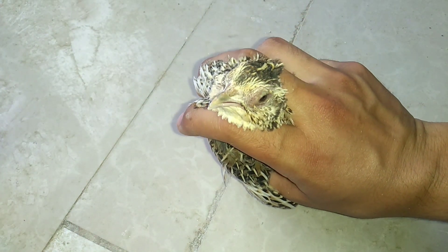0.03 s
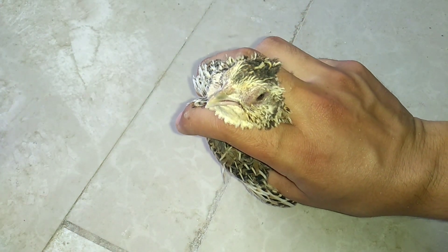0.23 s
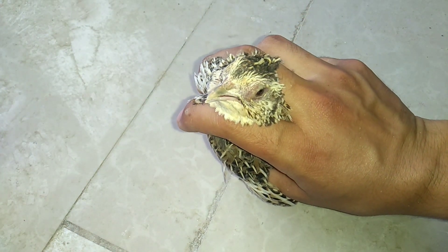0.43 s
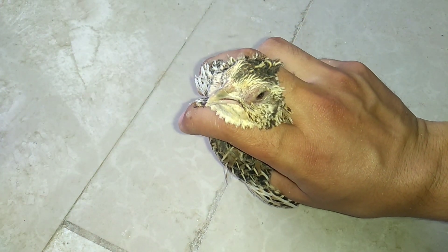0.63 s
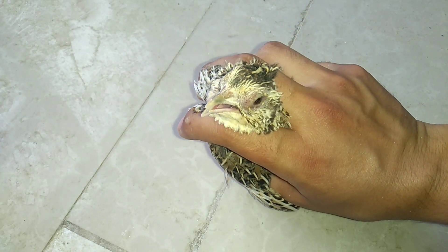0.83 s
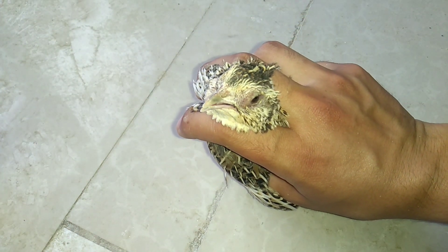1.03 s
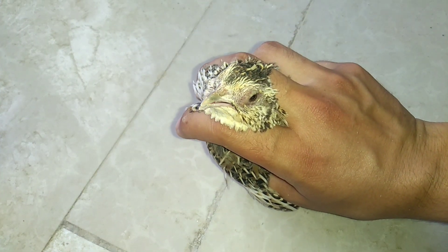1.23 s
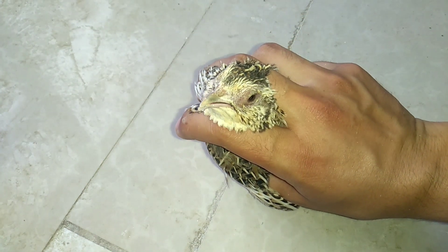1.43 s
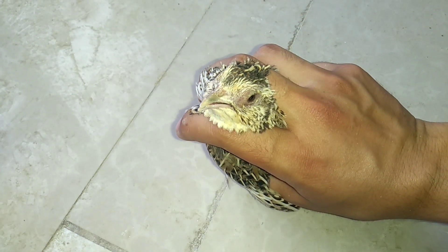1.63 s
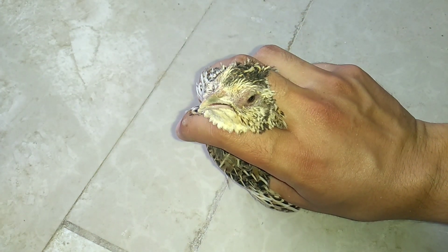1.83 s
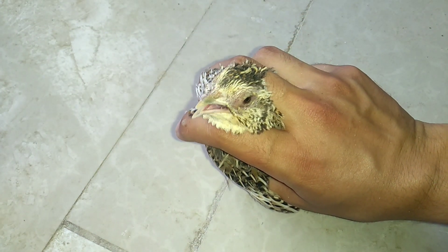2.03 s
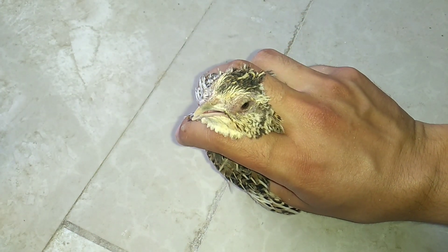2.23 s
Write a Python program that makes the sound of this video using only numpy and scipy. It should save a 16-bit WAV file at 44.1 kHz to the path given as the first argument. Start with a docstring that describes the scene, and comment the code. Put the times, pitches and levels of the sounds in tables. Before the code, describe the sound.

A held quail gives hoarse, high, gliding chirps in quick bursts, after several hissing feather rustles at the start; dull soft bumps, low rumble and faint hiss, close microphone in a small echoing tiled room.

```python
"""Quail protesting in the hand

A quail is held above the floor of a small, echoing tiled room, over a low rumble and faint hiss.
Four hissing rustles come early, with fainter ones between and after; dull bumps and faint rings are scattered through.
The bird's hoarse chirps are short gliding tones, many rough, that jump between high and low registers.
Shaken membrane tones make the voice, shaped noise the rest; noise echoes make the room."""
import sys
import numpy as np
from scipy import signal
from scipy.fft import rfft, irfft, next_fast_len
from scipy.io import wavfile

SR = 44100
rng = np.random.default_rng(int(sys.argv[2]) if len(sys.argv) > 2 else 0)


def store_wav(level_fs):
    """Save 16-bit WAV to argv[1]."""
    pcm = np.round(np.clip(np.atleast_2d(level_fs), -1, 1) * 32767)
    wavfile.write(sys.argv[1], SR, pcm.T.astype(np.int16))


N = 99930
T = np.arange(N) / SR  # seconds


def undb(db):
    """Decibels to gain."""
    return 10 ** (np.asarray(db) / 20)


def unit(x):
    """Scale to rms 1."""
    return x / np.sqrt(np.mean(x ** 2))


def bins(size):
    """Frequencies in Hz of a real spectrum, the lowest raised to 1 Hz so that its logarithm exists."""
    return np.maximum(np.fft.rfftfreq(size, 1 / SR), 1)


def on_log(points, hz):
    """Read (Hz, value) points on a log-frequency axis."""
    point_hz, values = np.array(points).T
    return np.interp(np.log(hz), np.log(point_hz), values)


def noise(gain):
    """Noise of rms 1, white noise weighted in frequency by gain(Hz)."""
    size = next_fast_len(N, real=True)
    spectrum = rfft(rng.standard_normal(size)) * gain(bins(size))
    return unit(irfft(spectrum, size)[:N])


def coloured(points, tilt_db=0):
    """Noise of rms 1 with a (Hz, dB) spectrum, tilted in dB per octave above its third point."""
    def gain(hz):
        octaves = np.log2(np.maximum(hz, points[2][0]))
        return undb(on_log(points, hz) + tilt_db * octaves)
    return noise(gain)


def flutter(rate_hz):
    """Random wavering of rms 1, falling away steeply above a given rate."""
    return noise(lambda hz: 1 / (1 + (hz / rate_hz) ** 4))


def swell(start, rise, hold, release):
    """Straight-line attack, hold and release, all in seconds."""
    corners = start + np.cumsum([0, rise, hold, release])
    return np.interp(T, corners, [0, 1, 1, 0])


def rustles():
    """Feathers brush past the hand in short strokes of unsteady hiss, coloured by whistling resonances."""
    # Strokes. Each row: start, rise, hold and release in seconds, hiss level in dB before the low cut,
    # whistle in dB against the hiss, treble tilt in dB per octave, low edge in Hz.
    strokes = [(-.005, 0.061, 0.0091, 0.05, -17.5, -4.5, 0.5, 696),
               (0.148, 0.035, 0.039, 0.05, -19, 0.5, 2, 570),
               (0.468, 0.022, 0.034, 0.028, -19.5, -10.5, 0.5, 844),
               (0.637, 0.028, 0.042, 0.022, -20.5, -7.5, -0.5, 1060),
               (0.369, 0.0066, 0.008, 0.018, -42.5, -12, 12, 587),
               (0.929, 0.022, 0.022, 0.032, -46.5, -20, -18, 1600),
               (1.029, 0.015, .01, 0.06, -44, -34, -12, 1700), (1.57, 0.02, .03, 0.078, -51, -22, 14, 400)]
    # Spectrum of the hiss. Each row: frequency in Hz, relative level in dB.
    hiss_spectrum = [(100, -50), (600, -30.5), (1100, -22), (1600, -14), (2100, -11), (3200, -1),
                     (5500, -0.5), (7000, 1), (8000, -7), (10000, -10), (12000, -17.5), (15500, -20.5)]
    # Whistling resonances. Each row: centre in Hz, width in Hz at half gain, peak in dB.
    resonances = [(4950, 130, -10.5), (6030, 890, -9), (1570, 33, -18.5)]

    def whistle_gain(hz):
        return sum(undb(db) / (1 + (2 * (hz - centre) / width) ** 2) for centre, width, db in resonances)

    out = np.zeros(N)
    for start, rise, hold, release, db, whistle_db, tilt_db, edge_hz in strokes:
        hiss = coloured(hiss_spectrum, tilt_db) + undb(whistle_db) * noise(whistle_gain)
        unsteady_db = 2.6 * flutter(rate_hz=300)
        stroke = undb(db + unsteady_db) * hiss
        low_cut = signal.butter(10, edge_hz, "high", fs=SR, output="sos")
        out += swell(start, rise, hold, release) * signal.sosfilt(low_cut, stroke)
    return out


def low_rumble():
    """Low noise under the room sound, its level drifting throughout."""
    # Course of the level. Each row: time in seconds, level in dB.
    level_course = [(0.0, -53), (0.06, -67), (0.25, -85.5), (0.5, -44), (0.55, -49), (0.58, -49),
                    (0.8, -60), (0.82, -55.5), (1.11, -62.5), (1.16, -61), (1.26, -64), (1.32, -48.5),
                    (1.57, -72), (2.26, -79)]
    # Spectrum of the rumble. Each row: frequency in Hz, relative level in dB.
    rumble_spectrum = [(25, -18), (55, -11), (75, -0.5), (130, 5.5), (180, -7.5), (300, -19.5), (700, -55)]
    level_db = np.interp(T, *np.array(level_course).T)
    return undb(level_db) * coloured(rumble_spectrum)


def faint_hiss():
    """Steady broad noise at the bottom of the sound."""
    # Spectrum of the hiss. Each row: frequency in Hz, relative level in dB.
    floor_spectrum = [(25, -20), (100, -1.5), (300, -3), (700, -7.5), (1300, -8), (1900, -19), (2800, -1),
                      (5000, -5.5), (6000, -13.5), (7200, -4.5), (10000, -8), (15500, -18)]
    return undb(-66) * coloured(floor_spectrum)


def rings():
    """Faint narrow bands of noise, heard as tones of steady pitch that swell and fade."""
    # Rings. Each row: start, rise, hold and release in seconds, pitch in Hz, level in dB before the room.
    faint_tones = [(0.112, 0.021, .02, .02, 1570, -37.5), (0.873, 0.049, .04, 0.063, 316, -67),
                   (1.115, .06, 0.059, .03, 301, -56.5), (2.078, 0.013, 0.07, 0.016, 1236, -57.5)]
    width = 0.11  # share of the pitch, between the 1/e points
    out = np.zeros(N)
    for *shape, pitch, db in faint_tones:
        band = noise(lambda hz: np.exp(-(2 * (hz / pitch - 1) / width) ** 2))
        out += swell(*shape) * undb(db) * band
    return out


def bumps():
    """Dull scuffs as the grip shifts: swells of mostly low noise."""
    # Scuffs. Each row: start, rise, hold and release in seconds, level in dB before the room.
    scuffs = [(0.377, 0.047, 0.037, 0.049, -37.5), (1.145, 0.034, .04, .03, -60),
              (1.24, 0.037, 0.032, 0.08, -41.5), (1.597, .03, .03, .04, -66.5)]
    # Spectrum of a scuff. Each row: frequency in Hz, relative level in dB.
    scuff_spectrum = [(40, -37.5), (110, -21), (175, 2.5), (245, -0.5), (340, -13.5), (490, -3),
                      (800, -11.5), (1500, -19), (2500, -15), (6000, -31)]
    return sum(swell(*shape) * undb(db) * coloured(scuff_spectrum) for *shape, db in scuffs)


def syrinx(pitch, rough, bright_db, rasp_db):
    """A membrane tone shakes with roughness in pitch and strength; its overtones ring the throat and air rasps."""
    # Overtones. Each row: multiple of the pitch, level in dB against the fundamental before the lifts.
    overtones = [(2, -19.5), (3, -24), (4, -29)]
    # Spectrum of the breathy rasp. Each row: frequency in Hz, relative level in dB.
    rasp_spectrum = [(1200, -8), (1900, -12.5), (3200, -14), (4300, 0), (7500, -12), (9500, -12),
                     (15000, -18)]
    throat_hz, throat_width_hz, throat_db = 3400, 350, 12  # lifts overtones near it; width is half lift to centre
    # depths at full roughness: shares of the pitch, then of log strength
    jitter, jitter_hz, wobble, wobble_hz = .1, 544, .055, 130
    shimmer, shimmer_hz = 0.36, 400
    hoarse_db, hoarse_spread_hz = -5, 460  # turbulence around the pitch, at full roughness

    unsteady = jitter * flutter(jitter_hz) + wobble * flutter(wobble_hz)
    phase = 2 * np.pi * np.cumsum(pitch * (1 + rough * unsteady)) / SR
    tone = np.sin(phase)
    for k, db in overtones:
        lift_db = throat_db / (1 + ((k * pitch - throat_hz) / throat_width_hz) ** 2)
        audible = k * pitch < SR / 2  # no aliases
        tone = tone + undb(db + bright_db + lift_db) * np.sin(k * phase) * audible

    depth = shimmer * rough
    shake = np.exp(depth * flutter(shimmer_hz) - depth ** 2)  # the square holds the mean power
    hoarse = noise(lambda hz: np.exp(-((hz - np.mean(pitch)) / hoarse_spread_hz) ** 2 / 2))
    voice = np.sqrt(2) * tone * shake
    rasp = undb(rasp_db) * coloured(rasp_spectrum)
    return voice + rasp + undb(hoarse_db) * rough * hoarse


def quail():
    """Short gliding notes in register jumps leave by the beak; the two sides of the syrinx may overlap."""
    # Notes of the chirps. Each row: start in seconds, length in seconds between the edges, first and last
    # pitch in Hz, level of the fundamental in dB before beak and room, roughness from 0 to 1,
    # lift of the overtones in dB, breathy rasp in dB against the fundamental.
    notes = [ (0.782, 0.017, 2462, 2120, -26.5, 0.54, -22, -21),
             (0.801, 0.055, 3225, 3356, -31, 0.1, 3, -16), (0.962, 0.046, 2184, 2254, -44.5, 0.5, -12, -7),
             (1.076, 0.033, 4396, 4480, -25, 0.22, 1, -14), (1.09, 0.028, 2370, 2402, -31.5, 0.65, -5, -9),
             (1.114, 0.031, 3027, 3043, -21, 0.33, -0.5, -30),
             (1.119, 0.018, 3750, 3400, -24, .4, 6.5, -14), (1.143, .035, 2638, 2657, -25, 0.26, 9, -24),
             (1.149, 0.0408, 3452, 3473, -17, 0.3, 0.5, -17.5),
             (1.199, 0.019, 2480, 2044, -24.5, .5, -8, -10.5),
             (1.226, 0.018, 3785, 3150, -17.5, .5, 3, -21.5),
             (1.401, 0.034, 3360, 2840, -43.5, 0.37, 11, -6), (1.422, .03, 2837, 2077, -32.5, 0.34, 4, -28),
             (1.454, 0.027, 3615, 3607, -31.5, 0.31, 4.5, -21),
             (1.464, 0.036, 3151, 3075, -29.5, 0.24, 2.5, -26),
             (1.513, 0.038, 1771, 1750, -38, 0.22, 11.5, -12),
             (1.789, 0.038, 4680, 4655, -30, .3, 0.5, -21.5),
             (1.823, 0.036, 2890, 3157, -32, 0.22, -10, -37), (1.835, 0.0125, 3646, 3234, -23, 0.5, 2, -25),
             (1.851, 0.013, 2756, 2607, -22.5, 0.33, 0.5, -38),
             (1.867, 0.032, 3588, 3332, -23.5, 0.52, 3, -17),
             (1.869, 0.021, 2616, 2014, -30, 0.88, -1, -16),
             (1.892, 0.026, 3250, 3281, -21, 0.29, -4.5, -20), (2.08, 0.034, 4650, 4950, -31, 0.58, -8, -4),
             (2.087, 0.077, 3934, 3270, -31.5, 0.85, -9, -1), (2.113, 0.053, 2864, 2787, -30, 0.42, 15, -5),
             (2.162, 0.025, 3440, 3403, -21.5, 0.33, 11.5, -4)]
    # Response of the beak. Each row: frequency in Hz, gain in dB.
    beak_response = [(700, -41), (1400, -24.5), (1800, -7), (2700, 1), (3600, 1), (4100, -3.5), (4700, -3),
                     (5250, -0.5), (5900, -3), (7100, -1.5), (8300, 1), (9500, -7), (12000, -9.5),
                     (15500, -9.5)]
    edge = 0.0031  # attack and release of a note, seconds
    out = np.zeros(N)
    for start, length, first_hz, last_hz, db, rough, bright_db, rasp_db in notes:
        pitch = np.interp(T, [start, start + length + edge], [first_hz, last_hz])
        voice = syrinx(pitch, rough, bright_db, rasp_db)
        out += swell(start, edge, length, edge) * undb(db) * voice
    return irfft(rfft(out) * undb(on_log(beak_response, bins(N))), N)


def room(x):
    """Tiles return a burst of early echoes and a dense tail whose bands die away at their own rates."""
    # Reverberation. Each row: frequency in Hz, time in seconds to fall by 60 dB.
    decay_times = [(100, 0.25), (400, 0.35), (1500, 0.58), (3200, 0.41), (6000, 0.28), (10000, 0.28),
                   (15000, 0.15)]
    direct_db, tail_db, early_db = -3.5, -5, -9.5
    early_decay, first_echo = 0.047, 0.0033  # seconds: fall to 1/e, silence ahead of the echoes

    t = T[:SR]
    hz = bins(SR)
    echoes, tail = rfft(rng.standard_normal(SR)), 0
    for k, (_, t60) in enumerate(decay_times):
        # each band overlaps its neighbours; together they add up to one
        share = on_log([(f, j == k) for j, (f, _) in enumerate(decay_times)], hz)
        tail = tail + irfft(echoes * share, SR) * np.exp(-np.log(1000) * t / t60)
    early = rng.standard_normal(SR) * np.exp(-t / early_decay)
    response = undb(tail_db) * unit(tail) + undb(early_db) * unit(early)
    response = response * (t > first_echo) / np.sqrt(SR)
    return undb(direct_db) * x + signal.fftconvolve(x, response)[:N]


def scene():
    """Bird and handling sound in the room, over a low rumble and faint hiss."""
    in_room = room(rustles() + rings() + bumps() + quail())
    return (in_room + low_rumble() + faint_hiss())[None]


def record(dry):
    """The recorder cuts the top steeply above 15650 Hz."""
    top_cut = signal.ellip(10, .2, 80, 15650, fs=SR, output="sos")  # 0.2 dB ripple, 80 dB stop
    return signal.sosfilt(top_cut, dry)


dry = scene()
out = record(dry)
store_wav(out)
```